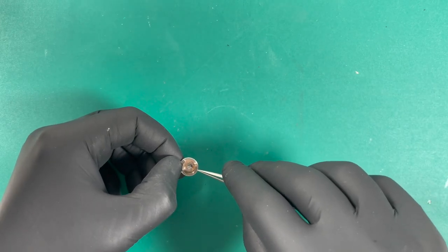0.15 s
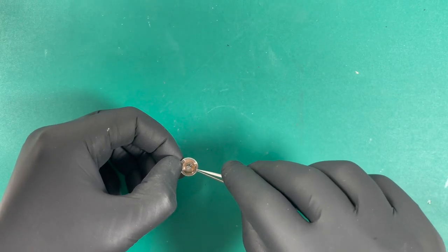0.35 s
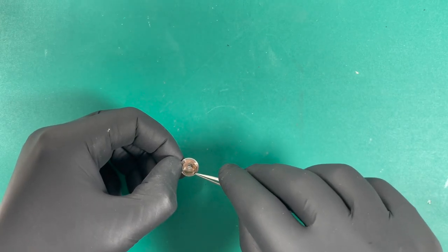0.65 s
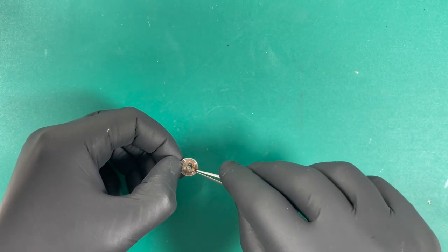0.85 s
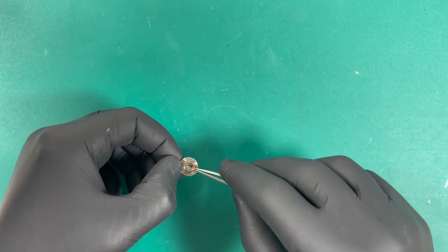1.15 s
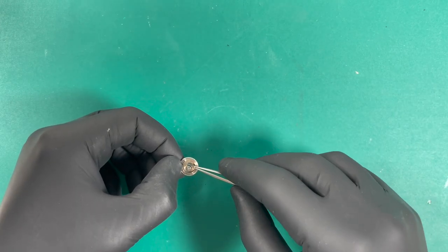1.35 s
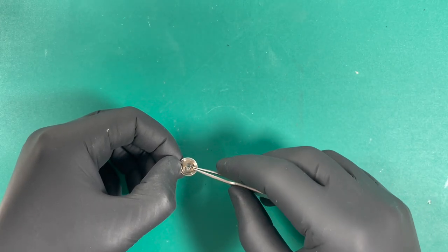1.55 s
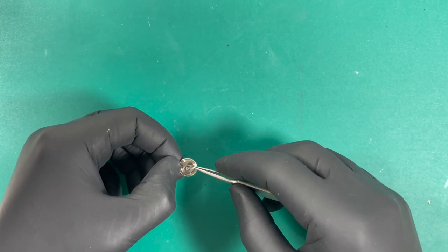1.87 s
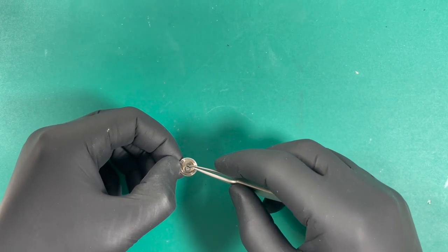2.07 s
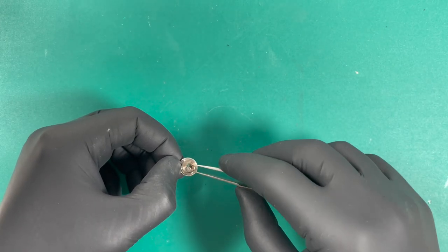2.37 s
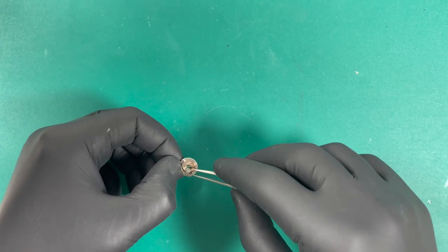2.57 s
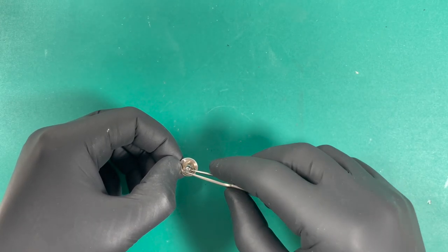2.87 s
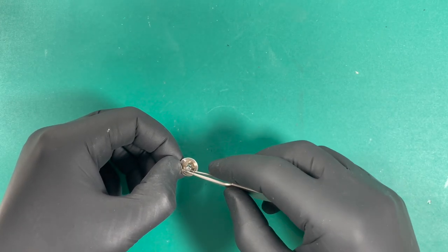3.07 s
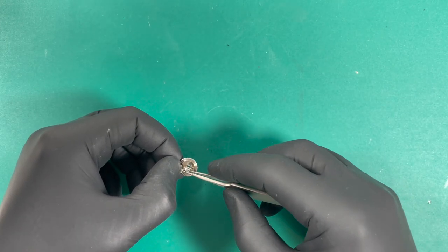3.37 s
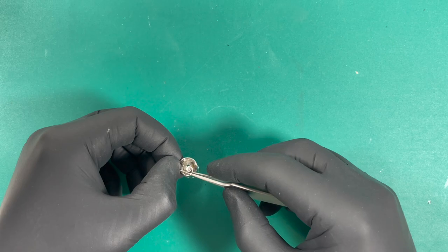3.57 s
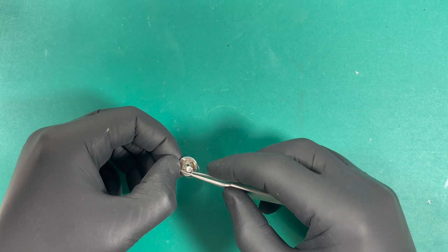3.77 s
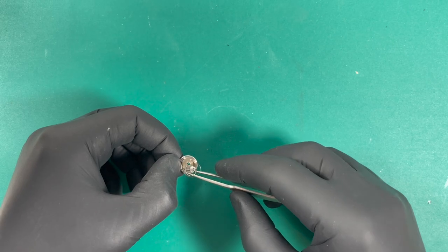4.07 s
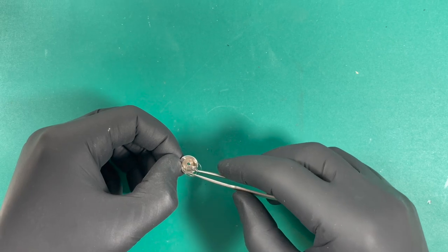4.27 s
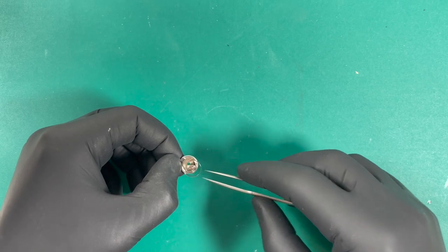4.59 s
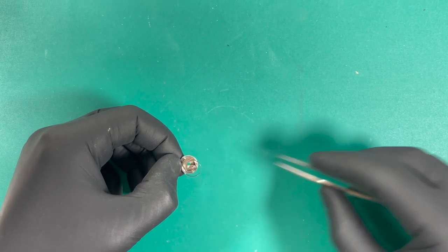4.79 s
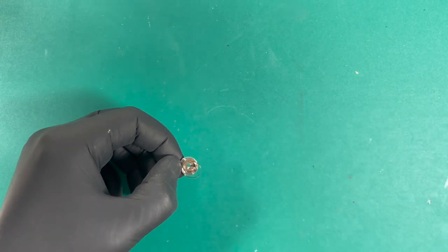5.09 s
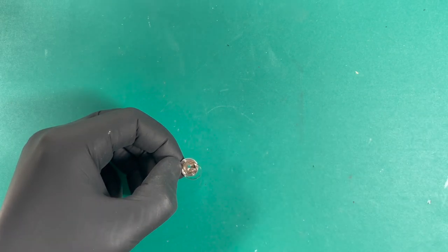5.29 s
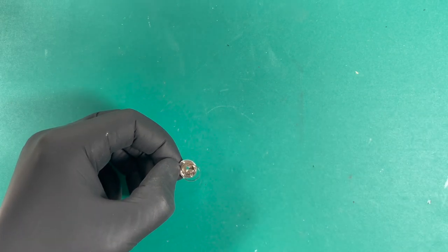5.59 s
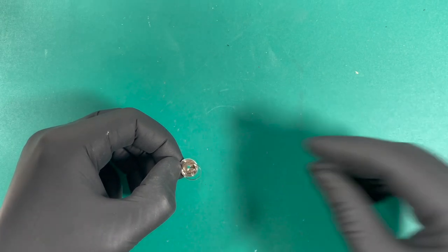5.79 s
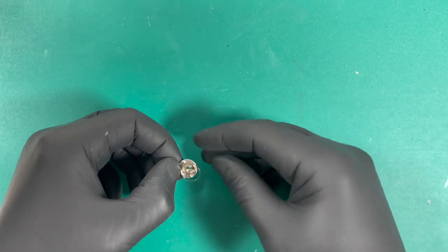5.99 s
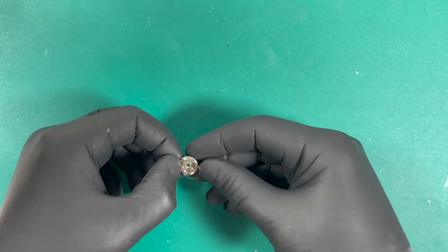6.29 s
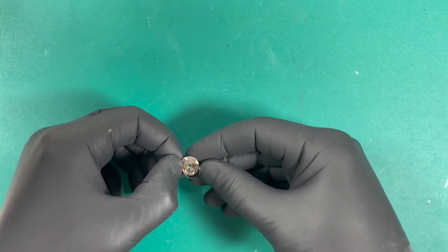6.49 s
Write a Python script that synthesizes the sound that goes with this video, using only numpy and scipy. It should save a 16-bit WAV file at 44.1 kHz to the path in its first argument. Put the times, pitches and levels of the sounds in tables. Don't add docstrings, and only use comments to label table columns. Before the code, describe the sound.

A small, quiet indoor room with a low, slightly fluctuating fan rumble and mains hum throughout. Very close to a stereo microphone, steel tweezers work at a tiny metal part. From 0.4 s come sparse, thin, bright ticks, with a sharper pair near 0.8 and a firm snap at 1.85. Small clicks continue with faint, clumpy gritty scraping around 2.3 to 2.8, another firm tick at 2.85, and the hardest slip at 3.6, which lightly knocks the holder. A tight cluster clicks at 4.37, another at 4.55, then near quiet. Around 5.45 a brief scuff leads into the loudest event: at 5.55 the tweezers hit the bench off to one side with a hard crack, bouncing and chattering until about 5.66, with a short steel ring, low thud and small room reflection. A faint tap at 6.04 and soft glove rustles follow, fading into hum until 6.6.

```python
import sys
import numpy as np
from scipy import signal
from scipy.fft import rfft, irfft, next_fast_len
from scipy.io import wavfile
from scipy.ndimage import uniform_filter1d

SR = 44100
rng = np.random.default_rng(int(sys.argv[2]) if len(sys.argv) > 2 else 0)


def to_wav(s):
    ch = np.atleast_2d(s).T
    pcm = np.round(np.clip(ch, -1, 1) * 32767)
    wavfile.write(sys.argv[1], SR, pcm.astype(np.int16))


def to_linear_factor(level_db):
    exponent = np.asarray(level_db, float) / 20
    return 10 ** exponent


N = 293265

# frequency in Hz, level in dB per Hz.
TIP_TREBLE = [(5000, -51), (7800, -10), (8800, -5.5), (10000, -9), (12000, -8), (13800, 4), (15200, -7.5),
              (16200, -24.5)]


def ticks():
    # start in seconds, peak in dB, body minus bright in dB, body ring in Hz.
    firm_slips = [(0.394, -50, -14, 5360), (0.7426, -47.5, -17.5, 8660), (0.7904, -40, -17.5, 4240),
                  (1.1065, -49, -9.5, 8400), (1.249, -50, -18, 8450), (1.314, -51.5, -18.5, 3800),
                  (1.429, -52.5, -12.5, 8060), (1.8528, -33.5, -14, 7400), (2.0843, -56.5, -18, 7080),
                  (2.3183, -39, -18, 8300), (2.509, -43.5, -20.5, 8100), (2.5471, -44, -11.5, 8550),
                  (2.8405, -34.5, -7.5, 7060), (2.9738, -50, -5.5, 5800), (3.0897, -51.5, -13.5, 6100),
                  (3.2061, -51, -14, 6150), (3.4322, -54, -7, 7460), (3.564, -54, -8, 5560),
                  (3.5907, -23.5, -8.5, 7300), (3.5954, -39, -9.5, 5340), (3.8726, -47.5, -11, 3300),
                  (4.0383, -40, -9, 3360), (4.1497, -43.5, -9, 6060), (4.3641, -40, -16, 6400),
                  (4.369, -31, -14, 7300), (4.3726, -30, -17.5, 6270), (4.3769, -36.5, -10, 8200),
                  (4.542, -34, -26, 8350), (4.5565, -47, -15, 6300), (4.594, -54, -10.5, 8200)]
    # start in seconds, peak in dB.
    touches = [(0.6389, -71), (0.656, -58.5), (0.725, -57), (1.055, -65), (1.086, -62.5), (1.1933, -62),
               (1.415, -56.5), (1.535, -64), (1.6307, -64), (1.9764, -67), (2.103, -55.5), (2.183, -60),
               (2.656, -59), (2.7028, -65), (2.7204, -57.5), (2.91, -57), (3.2839, -67), (3.509, -63),
               (3.7913, -62), (3.9752, -57.5), (4.032, -49), (4.3221, -64), (4.452, -56), (4.4804, -68),
               (4.5062, -64), (4.529, -64), (4.969, -59.5), (5.2425, -69.5)]
    # frequency in Hz, width in Hz, level in dB.
    part_modes = [(3250, 310, -13), (4150, 250, -5), (5200, 160, -7.5), (6400, 1700, 17.5),
                  (7270, 760, -15), (8100, 260, -21.5)]
    # start in seconds, peak in dB.
    holder_knocks = [
        (1.43, -78),
        (1.8528, -75),
        (2.0824, -73),
        (2.5484, -73),
        (3.207, -77),
        (3.5906, -54.5),
        (3.8726, -75),
        (4.368, -59.5),
    ]
    # frequency in Hz, level in dB, t60 in seconds.
    holder_modes = [(1872, -8.5, 0.031), (1440, -13.5, 0.018), (708, -19, 0.0029), (380, -20.5, 0.01294)]
    touch_body_db, touch_ring_hz = -13.5, 6200
    size, skid_s = 1024, 0.0031

    out = np.zeros(N)
    u = np.arange(size) / SR / skid_s
    slips = rng.standard_normal((80, size)) * np.minimum(u * 3, 1) * np.exp(-u ** 2)
    spot_db = 1.8 * rng.standard_normal((80, len(part_modes)))
    small = signal.butter(4, 2500, "high", fs=SR)
    rows = firm_slips + [(s, db, touch_body_db, touch_ring_hz) for s, db in touches]
    for (s, db, body_db, body_hz), slip, spot in zip(rows, slips, spot_db):
        modes = [(hz, mode_db + lift, 2.4 / width) for (hz, width, mode_db), lift in zip(part_modes, spot)]
        own = ring([(body_hz, 0, 0.011)], size)
        body = peaked(ring(modes, size)) + 0.44 * own
        part = signal.lfilter(*small, signal.fftconvolve(slip, body)[:size])
        fizz = peaked(colour(slip, TIP_TREBLE))
        add(out, s, to_linear_factor(db) * (fizz + to_linear_factor(body_db) * peaked(part)))
    for (s, db), slip in zip(holder_knocks, slips[::-1]):
        knock = signal.fftconvolve(slip, ring(holder_modes, size))[:size]
        add(out, s, to_linear_factor(db) * peaked(knock))
    return out


def drop():
    # start in seconds, peak
    # in dB, treble in dB, thud in dB.
    bounces = [(5.443, -55.5, -42, -41), (5.534, -44, -26.5, -41), (5.5447, -23.5, -13.5, -39),
               (5.552, -7.5, 0, -30.5), (5.5534, -10, -8, -29.5), (5.589, -10.5, -6, -26.5),
               (5.614, -14, -26, -22.5), (5.631, -25, -30.5, -20.5), (5.645, -25.5, -35.5, -27),
               (5.654, -31, -34, -24.5), (6.0377, -46, -11, -33)]
    # time in seconds, level in dB.
    chatter = [
        (5.533, -57.5),
        (5.554, -21.5),
        (5.579, -39),
        (5.592, -23.5),
        (5.597, -31.5),
        (5.649, -28),
        (5.76, -83),
    ]
    # frequency in Hz, level in dB per Hz.
    crack = [(200, -40), (350, -12), (700, -11.5), (1050, -12.5), (1430, 0.5), (1690, -6), (2100, 3.5),
             (2900, -4.5), (4600, -3.5), (5200, -1), (6200, -6.5), (8500, -7), (11500, -11), (12500, -29.5),
             (16000, -48.5)]
    # frequency in Hz, level in dB per Hz.
    snap_colour = [(5500, -61), (7500, -8), (8500, 8.5), (11000, -8.5), (14000, -10), (16300, -17.5)]
    # frequency in Hz, level in dB, t60 in seconds.
    steel_modes = [(2130, -1, 0.069), (3470, -9, 0.24), (5200, -6, 0.091), (6520, -5.5, 0.11),
                   (7530, -2.5, 0.26), (8800, -6.5, .2), (11150, -14, 0.11), (13000, -10.5, 0.067),
                   (14300, -9.5, .15), (14350, -18.5, .15), (14700, -4, .1), (15400, -15.5, .12)]
    # frequency in Hz, level in dB, t60 in seconds.
    bench_modes = [
        (79, -4.5, 0.12),
        (122, -2.5, 0.17),
        (179, 6.5, 0.057),
        (247, -17.5, .05),
    ]

    size = 8000
    snaps, bench, t = np.zeros(N), np.zeros(N), np.arange(size) / SR
    chance = rng.standard_normal((16, size))
    for (s, db, treble_db, thud_db), noise in zip(bounces, chance):
        blow = noise * np.minimum(t / 4e-4, 1) * to_linear_factor(-60 * t / 0.016)
        snap = peaked(colour(noise[::-1] * to_linear_factor(-60 * t / 0.0064), snap_colour))
        steel = peaked(signal.fftconvolve(blow[:40], ring(steel_modes, size))[:size])
        steel *= to_linear_factor(-6 * ((s + t - 5.55) / 0.12) ** 6)
        thud = peaked(ring(bench_modes, size)) * to_linear_factor(thud_db)
        add(snaps, s, to_linear_factor(db + treble_db) * (snap + to_linear_factor(-12.5) * steel))
        add(bench, s, to_linear_factor(db) * (peaked(colour(blow, crack)) + thud))
    s, db = np.transpose(chatter)
    level = to_linear_factor(np.interp(np.arange(N) / SR, s, db, -140, -140) - 5)
    return snaps, bench + colour(grit(9000, spread_db=2.0), crack) * level


def rubbing():
    # time in seconds, fizz in dB.
    pressure = [(0.0, -102), (0.49, -101), (1.28, -89), (1.62, -100), (1.85, -101), (2.26, -86),
                (2.77, -90.5), (3.4, -102), (3.73, -90), (4.0, -88), (4.16, -97.5), (4.48, -90.5),
                (4.6, -102), (5.4, -97.5)]
    s, fizz_db = np.transpose(pressure)
    clumps = wander(rng.standard_normal(N), 500)
    level_db = np.interp(np.arange(N) / SR, s, fizz_db) + 3.1 * clumps
    return colour(grit(3700, spread_db=2.0), TIP_TREBLE) * to_linear_factor(level_db)


def scuffs():
    # start in seconds, length in seconds, level in dB rms,
    # centre in Hz, width in octaves.
    short_scuffs = [(1.853, 0.038, -82.5, 5300, 0.14), (3.592, 0.0072, -60.5, 330, 0.8),
                    (3.591, 0.0026, -58, 1280, 0.95), (3.582, 0.0045, -65, 4400, .6),
                    (0.784, 0.015, -79.5, 2600, 0.086), (1.851, 0.0062, -79, 1520, 0.22),
                    (1.248, 0.057, -85.5, 4660, 0.75), (1.85, 0.029, -84, 2480, 0.19),
                    (2.08, 0.038, -92, 3820, 0.29), (2.232, 0.065, -79.5, 2650, 0.64),
                    (2.646, 0.078, -89, 5540, 0.55), (2.854, 0.071, -81, 5700, 0.31),
                    (3.937, 0.053, -89, 3500, 0.21), (4.095, 0.038, -88.5, 3280, .2),
                    (4.541, 0.078, -81.5, 6000, 0.16), (4.544, 0.068, -91, 4060, .08),
                    (5.436, 0.026, -65.5, 2180, 0.51), (5.444, 0.095, -79, 2020, 0.37),
                    (5.508, 0.089, -63.5, 2100, 0.66), (5.723, 0.11, -88, 2200, 0.23),
                    (5.959, 0.045, -78, 5200, 0.63), (6.005, 0.078, -81.5, 2410, 0.65),
                    (6.103, 0.056, -85.5, 4820, 0.56)]
    # start in
    # seconds, length in seconds, level in dB rms.
    fine_strokes = [(.63, .086, -80), (1.018, 0.061, -86), (1.22, 0.093, -82), (2.048, .071, -92),
                    (2.42, 0.047, -84), (2.509, 0.008, -51.5), (2.515, .035, -76), (2.642, 0.069, -81),
                    (3.5, 0.071, -84), (3.91, 0.15, -86), (4.274, 0.086, -90), (4.463, .12, -82),
                    (5.703, 0.16, -88.5), (5.96, .093, -83), (6.055, 0.11, -84), (6.189, .2, -94)]
    stroke_hz, stroke_octaves, catch_db = 13450, 0.12, 3.2

    out, rough = np.zeros(N), grit(14000, spread_db=0.5)
    rough = evened(rough * to_linear_factor(catch_db * wander(rough[::-1], 120)))
    rows = short_scuffs + [(*row, stroke_hz, stroke_octaves) for row in fine_strokes]
    for s, length_s, db, hz, octaves in rows:
        stroke = evened(rough[round(s * SR):][:round(length_s * SR)])
        near, far = 2 ** octaves, 8 ** octaves
        band = [(hz / far, -54), (hz / near, -6), (hz, 0), (hz * near, -6), (hz * far, -54)]
        add(out, s, to_linear_factor(db) * colour(stroke * signal.windows.tukey(len(stroke), 0.6), band))
    return out


def room(x):
    # frequency in Hz, t60 in seconds.
    decay = [
        (300, 0.87),
        (2000, 0.298),
        (6000, 0.16),
        (14000, 0.083),
    ]
    hold_s = 0.07
    taps = np.zeros((2, 16000))
    at = np.arange(160, 15960, 10) + rng.integers(0, 10, (2, 1580))
    np.put_along_axis(taps, at, rng.choice([-1., 1.], at.shape), 1)
    hz, t, z = signal.stft(taps, SR, nperseg=128)
    fade_db = -60 * t / read(decay, hz)[:, None] - 2 * (t / hold_s) ** 4
    tail = signal.istft(z * to_linear_factor(fade_db), SR, nperseg=128)[1]
    return signal.fftconvolve(x[None], tail / np.linalg.norm(tail[0]), axes=1)[:, :N]


def hum():
    # frequency in Hz, level in dB per Hz.
    mid_colour = [(30, -51.5), (45, -13.5), (62, -2.5), (103, -2), (124, -16), (197, -23), (232, -16.5),
                  (296, -33.5), (831, -46), (8000, -55.5), (9000, -72), (11400, -72.5), (13400, -57),
                  (15000, -81)]
    # frequency in Hz, level in dB per Hz.
    side_colour = [(25, -41.5), (97, -8.5), (232, -13), (300, -21.5), (669, -22.5), (2150, -39),
                   (5000, -40.5), (6200, -50), (7500, -43), (13500, -42.5), (15000, -65.5)]
    # frequency in Hz, level in dB rms.
    steady_tones = [
        (60, -67.5),
        (100, -63),
        (143, -75),
        (231, -73),
        (246, -87),
    ]
    # frequency in Hz, left minus right in dB.
    balance = [(60, -1.0), (180, -2.5), (550, 0.5), (1650, 1), (4970, -1), (15000, 3.5)]
    mid_db, side_db = -58.5, -74.5

    frames, hz = N // 1024 + 6, np.fft.rfftfreq(4096, 1 / SR)
    a, b = rng.standard_normal((2, 2, frames, 2049)).transpose(0, 1, 3, 2)
    shape = to_linear_factor(np.array([read(mid_colour, hz), read(side_colour, hz)]))
    shape *= to_linear_factor(np.array([[mid_db], [side_db]])) / np.linalg.norm(shape, axis=1, keepdims=True)
    swell_db = draught(np.arange(frames) * 1024 / SR)
    mid, side = (a + 1j * b) * shape[:, :, None] * to_linear_factor(swell_db * (hz[:, None] < 130))
    lean = to_linear_factor(read(balance, hz) / 2)[:, None]
    both = np.array([(mid + side) * lean, (mid - side) / lean])
    out = signal.istft(both, nperseg=4096, noverlap=3072)[1][:, :N]
    t = np.arange(N) / SR
    for hz, db in steady_tones:
        drift = wander(rng.standard_normal(N), 6000)
        level_db = db + 1.4 * drift + (hz < 130) * 0.35 * draught(t)
        tone = np.sqrt(2) * to_linear_factor(level_db) * np.sin(2 * np.pi * (hz * t + rng.random()))
        out = out + tone * to_linear_factor(read(balance, hz) / 2 * np.array([[1], [-1]]))
    return out


def draught(t):
    # time in seconds, depth in dB.
    sags = [(0.051, 6), (.62, 1), (1.11, 6), (1.52, 15.5), (2.502, 14), (3.002, 7), (3.361, 7.5),
            (3.78, 19.5), (4.57, 6.5), (5.15, 13.5), (5.91, 7.5), (6.32, 17.5)]
    lull_s, lift_db = 0.05, 1.5
    return lift_db - sum(db * np.exp(-((t - s) / lull_s) ** 2) for s, db in sags)


def ports(x, lag):
    size = next_fast_len(N + 999)
    turn = np.exp(.5j * read(lag, np.fft.rfftfreq(size, 1 / SR)))
    return irfft(rfft(x, size) * np.array([turn, 1 / turn]), size)[:, :N]


def diffuse(x):
    # frequency in Hz, gain in dB.
    sum_gain = [(100, 2), (8300, 0.5), (9200, -25), (11000, -23.5), (11900, -1), (15300, -3), (16200, -14)]
    # frequency in Hz, gain in dB.
    difference_gain = [(100, -20.5), (500, 0.5), (1300, -3.5), (2500, -0.5), (5000, -2), (6000, -9),
                       (7500, -1.5), (12800, 1.5), (14500, -13)]
    size = next_fast_len(N + 999)
    hz = np.fft.rfftfreq(size, 1 / SR)
    left, right = rfft(x, size)
    mid = (left + right) * to_linear_factor(read(sum_gain, hz))
    side = (left - right) * to_linear_factor(read(difference_gain, hz))
    return irfft(np.array([mid + side, mid - side]) / 2, size)[:, :N]


def grit(per_s, spread_db):
    size = to_linear_factor(spread_db * np.minimum(rng.exponential(1, N), 4)) * rng.standard_normal(N)
    return evened(size * (rng.random(N) < per_s / SR))


def ring(modes, size):
    t = np.arange(size) / SR
    return sum(to_linear_factor(db - 60 * t / t60) * np.sin(2 * np.pi * hz * t) for hz, db, t60 in modes)


def colour(x, points):
    gain_db = np.maximum(read(points, abs(np.fft.fftfreq(4096, 1 / SR))), -100)
    log_gain = np.log(to_linear_factor(gain_db))
    taps = np.fft.ifft(np.exp(np.conj(signal.hilbert(log_gain)))).real[:2048]
    return signal.oaconvolve(x, taps / np.linalg.norm(taps))[:len(x)]


def wander(x, size):
    return evened(uniform_filter1d(uniform_filter1d(x, size), size))


def evened(x):
    return x / np.sqrt(np.mean(x ** 2) + 1e-20)


def peaked(x):
    return x / (abs(x).max() + 1e-20)


def read(points, hz):
    f, value = np.transpose(points)
    return np.interp(np.log(hz + 1), np.log(f + 1), value)


def add(mix, s, sound):
    part = mix[round(s * SR):][:len(sound)]
    part += sound[:len(part)]


def scene():
    # frequency in Hz, left lead in rad.
    near_lag = [(100, -2.5), (3500, 1), (7000, 1.5), (10200, 3), (13500, 8), (16000, 6)]
    # frequency in Hz, left lead in rad.
    far_lag = [(100, 1), (600, 1.7), (1200, 1.9), (2500, 0.7), (4500, 1.9), (7000, 1.6), (10000, 3.5),
               (13000, 5.5), (16000, 6)]
    near, (snaps, bench) = ticks(), drop()
    direct = to_linear_factor(1.0) * ports(near, near_lag) + ports(snaps, far_lag)
    wide = to_linear_factor(3.5) * ports(rubbing() + scuffs(), near_lag)
    wide = wide + ports(bench, far_lag) * to_linear_factor(np.array([[0.5], [-0.5]]))
    thin = np.diff(near, prepend=0)
    echo = ports(room(thin)[0], near_lag) * to_linear_factor(-12.5)
    echo = echo + room(to_linear_factor(-15) * thin + to_linear_factor(-9.5) * (snaps + bench))
    return direct + diffuse(wide + echo) + hum()


def low_pass(x):
    return signal.sosfilt(signal.butter(12, 16800, fs=SR, output="sos"), x)


def record(dry):
    edge = signal.firwin(255, 16300, fs=SR)[None]
    steady = signal.sosfilt(signal.butter(2, 40, "high", fs=SR, output="sos"), dry)
    return low_pass(signal.oaconvolve(steady, edge, "same"))


dry = scene()
out = record(dry)
to_wav(out)
```